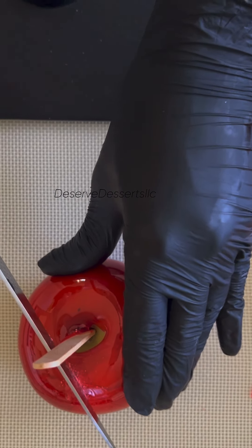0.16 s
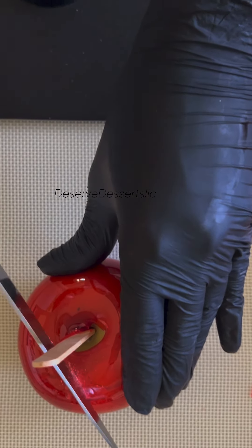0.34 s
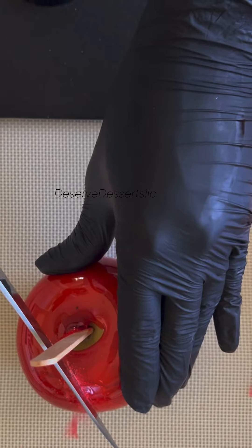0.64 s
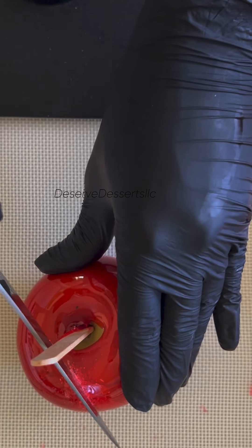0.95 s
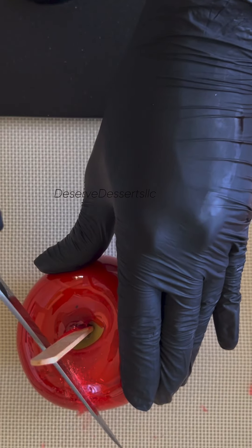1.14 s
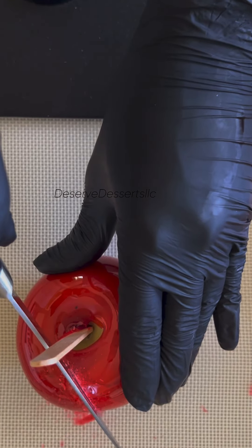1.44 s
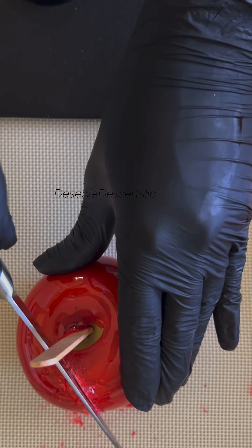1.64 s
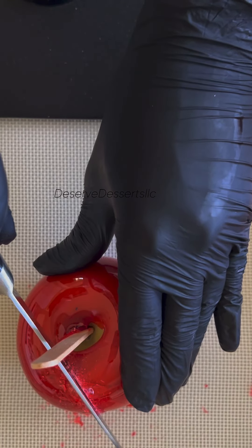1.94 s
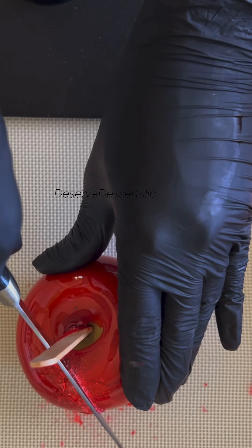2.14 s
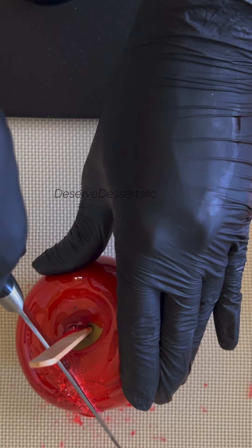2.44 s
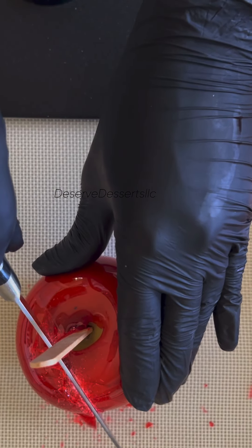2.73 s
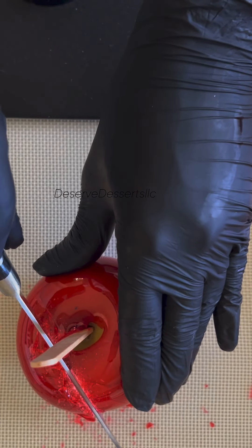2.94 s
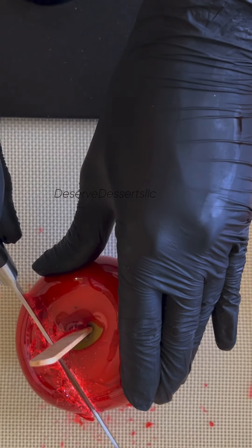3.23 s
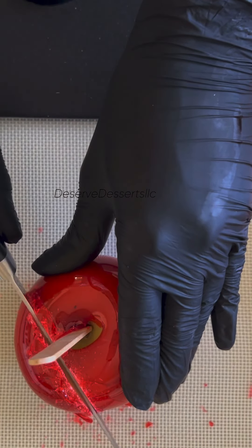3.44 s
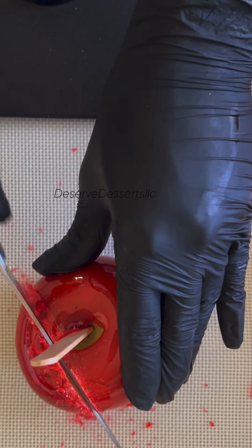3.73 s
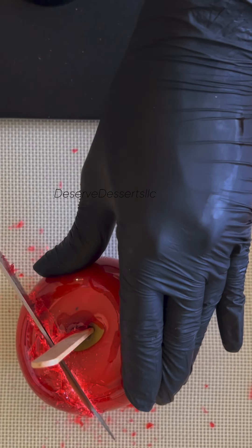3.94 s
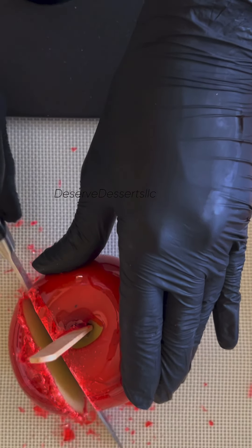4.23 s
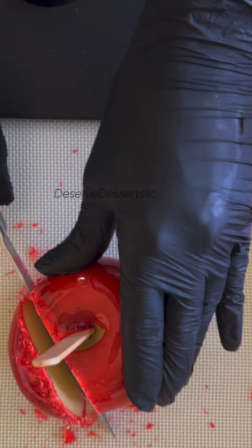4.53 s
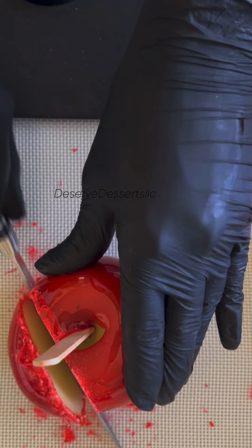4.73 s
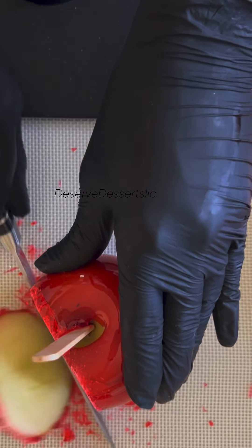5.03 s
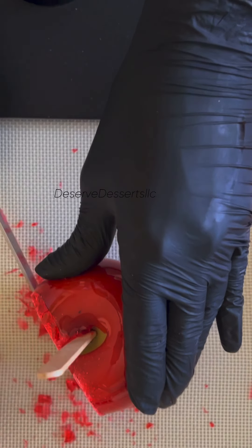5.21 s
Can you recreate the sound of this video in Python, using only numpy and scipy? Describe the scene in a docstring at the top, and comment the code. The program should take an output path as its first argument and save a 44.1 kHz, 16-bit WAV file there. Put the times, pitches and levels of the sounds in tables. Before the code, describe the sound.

Close, dry crunching and snapping of hard candy coating as a blade works down through an apple, ending in breakage and small dull knocks.

```python
"""A knife saws down through the hard sugar shell of an apple on a kitchen counter, heard by a phone close by.
An early thump of the hand's weight reaches the phone; the blade then rings high on the shell.
From about 1.2 s it rings damped inside the fruit, and towards the end lower, once it is through to the mat.
Bright cracks stand out of dense fine crunch, made of noise grains, and slips of the blade make the counter ring low.
Last, the cut piece rocks on the mat. A small kitchen answers briefly, and its quiet air lies under it all."""
import sys
import numpy as np
from scipy import signal
from scipy.fft import rfft, irfft
from scipy.io import wavfile

SR = 44100
rng = np.random.default_rng(int(sys.argv[2]) if len(sys.argv) > 2 else 0)


def master_out(mix):
    """Clip the mix to full scale and print it as 16-bit PCM to the path in sys.argv[1]."""
    frames = np.transpose(np.atleast_2d(mix))
    ceiling = np.clip(frames, -1, 1)
    pcm = np.round(ceiling * 32767).astype(np.int16)
    wavfile.write(sys.argv[1], SR, pcm)


N = 236799  # length in samples


def undb(db):
    """Decibels to gain."""
    return 10 ** (np.asarray(db) / 20)


def unit(x):
    """Scale to rms 1."""
    return x / np.sqrt(np.mean(x ** 2))


def filtered(x, order, hz, kind):
    """Let through only what lies above ("high") or below ("low") a pitch."""
    return signal.sosfilt(signal.butter(order, hz, kind, fs=SR, output="sos"), x)


def colour(x, points):
    """Causal filter through (Hz, dB) points, keeping the power of white noise."""
    size = 1024
    hz, db = np.transpose(points)
    bin_hz = np.arange(size // 2 + 1) * SR / size
    log_gain = np.interp(np.log(bin_hz + 1), np.log(hz), db) * np.log(10) / 20
    # folding the cepstrum forward in time makes the filter answer at once (minimum phase)
    fold = np.concatenate([[1], 2 * np.ones(size // 2 - 1), [1], np.zeros(size // 2 - 1)])
    h = irfft(np.exp(rfft(irfft(log_gain) * fold)))
    return signal.fftconvolve(x, h / np.linalg.norm(h))[:N]


def ring(x, modes, floor_hz):
    """A body of decaying modes that radiates little below floor_hz, keeping the power of white noise."""
    t = np.arange(SR // 5) / SR
    h = np.zeros(len(t))
    for k, (hz, width_hz, db) in enumerate(modes):
        # a wider mode dies faster; neighbours start in opposite directions
        h += (-1) ** k * undb(db) * np.exp(-np.pi * width_hz * t) * np.sin(2 * np.pi * hz * t)
    h = filtered(h, 3, floor_hz, "high")
    return signal.fftconvolve(x, h / np.linalg.norm(h))[:N]


def grit(rate, scatter_db, grain_s, bed):
    """Random fractures, rate per second: short noise grains of scattered size over a smooth bed."""
    sizes = undb(scatter_db * np.minimum(rng.exponential(size=N), 3))
    hits = (rng.random(N) < rate / SR) * sizes
    shape = signal.lfilter([1], [1, -np.exp(-1 / (grain_s * SR))], hits)
    return unit((unit(shape) + bed) * rng.standard_normal(N))


def bursts(times, dbs, rise_s, fall_s, carrier):
    """A carrier shaped into bursts with a quick rise and an exponential fall."""
    starts = np.zeros(N)
    starts[(times * SR).astype(int)] = undb(dbs)
    t = np.arange(SR // 4) / SR
    shape = (1 - np.exp(-t / rise_s)) * np.exp(-t / fall_s)
    return signal.fftconvolve(starts, shape)[:N] * carrier


def wander(rate):
    """Slow drift in straight lines between random levels, rate of them per second."""
    marks = np.arange(0, N + SR, SR / rate)
    return np.interp(np.arange(N), marks, rng.standard_normal(len(marks)))


# strokes of the knife; the last two columns are levels against the crunch, all before each layer's own trim:
# start_s [s], bite_s [s], hold_s [s], crunch_db [dB], rumble_db [dB], blade_db [dB]
KNIFE_STROKES = [(0.004, 0.013, 0.25, -69, 18, 2), (0.169, 0.094, 0.073, -48.5, 5, -1),
                 (0.389, 0.011, 0.062, -57, 19, -9), (0.487, 0.012, 0.13, -52, 15.5, -2),
                 (0.608, 0.012, 0.025, -48.5, 21, -8), (0.686, 0.011, 0.023, -55.5, 17.5, -3),
                 (1.061, 0.026, 0.011, -65, 30, -15), (1.097, 0.0094, 0.13, -43, 17.5, 0),
                 (1.401, 0.023, 0.11, -46, 8.5, 3), (1.624, 0.0072, 0.062, -45, 8, 2),
                 (1.712, 0.01, 0.032, -45.5, 8, 5), (1.892, 0.028, 0.083, -41, 14, 2),
                 (2.166, 0.039, 0.044, -51, 11, -1), (2.384, 0.034, 0.063, -43, 8, -0.5),
                 (2.501, 0.023, 0.51, -48, 9, 3), (2.775, 0.024, 0.2, -53.5, 14, 6.5),
                 (3.038, 0.048, 0.2, -39.5, 7.5, 2.5), (3.359, 0.011, 0.096, -50.5, 15.5, 13),
                 (3.498, 0.0096, 0.24, -56.5, 11.5, 11.5), (3.883, 0.015, 0.12, -36.5, 13, 9),
                 (3.957, 0.01, 0.18, -37.5, 13, 5.5), (4.213, 0.006, 0.06, -40.5, -5, 10),
                 (4.422, 0.022, 0.063, -69, 28.5, 18), (4.702, 0.018, 0.048, -55.5, 19.5, 12.5),
                 (4.748, 0.018, 0.058, -52, 18, 5.5), (4.879, 0.0044, 0.048, -41, 10, 14),
                 (5.052, 0.016, 0.059, -63.5, 29, 12.5), (5.111, 0.0068, 0.058, -43.5, -3, 7.5),
                 (5.182, 0.014, 0.044, -64.5, 22.5, 15), (5.283, .01, .08, -69, 18.5, 9)]
SAG_DB_PER_S = 31  # pressure eases while the edge slides
# how fast each layer dies once the edge stops
CRUNCH_RELEASE_DB_PER_S, COUNTER_RELEASE_DB_PER_S, BLADE_RELEASE_DB_PER_S = 246, 297, 200


def stroke_curves():
    """Levels of crunch, rumble and blade: each stroke bites, holds with a slow sag and dies away."""
    t = np.arange(0, N + SR // 10, 32) / SR
    start, bite, hold, crunch_db, rumble_db, blade_db = np.transpose(KNIFE_STROKES)[:, :, None]
    since = t - start
    rising = -20 * np.log10(np.clip(since / bite, .01, 1))
    sag = SAG_DB_PER_S * np.clip(since - bite, 0, None)
    stopped = np.clip(since - bite - hold, 0, None)
    layers = [(crunch_db, CRUNCH_RELEASE_DB_PER_S),
              (crunch_db + rumble_db, COUNTER_RELEASE_DB_PER_S),
              (crunch_db + blade_db, BLADE_RELEASE_DB_PER_S)]
    levels = []
    for db, release in layers:
        gain = undb(db - rising - sag - release * stopped)
        power = np.sum((since > 0) * gain ** 2, axis=0)  # overlapping strokes add up
        levels.append(np.interp(np.arange(N) / SR, t, 10 * np.log10(power + 1e-12)))
    return levels


# snaps of the shell, before trims: start_s [s], level_db [dB], blade_db [dB, blade and fruit against the snap]
SHELL_SNAPS = [(0.1562, -47, 6.5), (0.402, -29.5, -7.5), (0.5212, -28.5, -2), (0.603, -20.5, 0.5),
               (0.614, -27.5, -13), (0.712, -28, -9.5), (1.104, -19, -4), (1.133, -37, 3),
               (1.1817, -20, -6), (1.22, -20, -11), (1.2496, -23, -13.5), (1.4305, -22, -7.5),
               (1.639, -24, -2.5), (1.723, -31, -7.5), (1.9155, -20.5, -6.5), (1.995, -30, -23),
               (2.3947, -27, -13), (2.4208, -19, -7), (2.4488, -18, -12.5), (2.6234, -21.5, -7.5),
               (2.7033, -19.5, -15), (2.754, -22, -24), (2.9367, -29.5, -3.5), (2.983, -22.5, -39),
               (3.269, -18.5, -47), (3.3268, -21.5, -17), (3.3468, -14.5, -15), (3.362, -12.5, -8.5),
               (3.8952, -30, -20), (4.0093, -11, -3.5), (4.0998, -20, -43), (4.131, -15, -7.5),
               (4.2202, -11, -1), (4.794, -28, -6), (4.899, -25, 4), (5.114, -13, -0.5)]
# tone of breaking sugar: pitch_hz [Hz], level_db [dB per Hz]
SHARD_TONE = [(900, -34), (1470, -21), (2500, 1.5), (3550, -6.5), (4020, 3), (4580, -6), (5070, -1.5),
              (5970, -2.5), (8940, 1.5), (9960, -3.5), (12100, 2.5), (14700, -4), (16000, -7)]
SPLINTER_HZ = 6660  # thin splinters sound mainly above this


def shell(crunch_db):
    """Fine crunch of sugar under the edge; each larger snap runs on in a spray of smaller fractures."""
    s, db, blade_db = np.transpose(SHELL_SNAPS)
    chips = grit(400., 5., .0015, .5)
    splinters = grit(400., 5., .0012, .5)
    # a snap that hardly moves the blade is a thin splinter and sounds mostly at the top
    thin = np.clip((4.5 - blade_db) / 15, .02, .98)
    thick_db, thin_db = 10 * np.log10(1 - thin), 10 * np.log10(thin)
    noise = rng.standard_normal((2, N))
    crunch_gain = undb(crunch_db - 2.0)
    full = crunch_gain * chips
    full += bursts(s, db - 4.0 + thick_db, 0.0015, 0.003, noise[0])
    full += bursts(s, db - 31.5, 0.0089, 0.033, chips)  # spray of smaller fractures
    top = crunch_gain * splinters + bursts(s, db + thin_db, 0.00092, 0.0029, noise[1])
    return colour(full + filtered(top, 2, SPLINTER_HZ, "high"), SHARD_TONE)


# the blade rings high on the shell, is damped inside the fruit and rings lower once it is through;
# modes in each place, levels before scaling: pitch_hz [Hz], width_hz [Hz], level_db [dB]
SHELL_MODES = [(2180, 250, 2), (2780, 2800, 10), (4370, 520, -4.5)]
FRUIT_MODES = [(737, 470, 4.5), (1240, 370, 0), (1592, 410, 0), (2134, 220, -1), (2810, 940, -1)]
MAT_MODES = [(744, 147, -4), (1040, 200, -32), (1304, 220, 3.5), (1396, 60, -1), (1765, 250, -4.5),
             (3100, 2100, -41)]
# how deep the blade is: time_s [s], depth [0 on the shell, 1 in the fruit, 2 through to the mat]
BLADE_DEPTH = [(.15, 1.2), (.25, 0.024), (.9, 0.027), (1.2, 0.65), (1.42, 1.02), (3.7, 1), (4.2, 1.43),
               (4.7, 1.99)]


def depth_curve():
    """Depth of the blade over time."""
    return np.interp(np.arange(N) / SR, *np.transpose(BLADE_DEPTH))


def blade(blade_level_db):
    """Blade and fruit ring at mid pitches, driven by crunch and by the same snaps as the shell."""
    s, db, blade_db = np.transpose(SHELL_SNAPS)
    crunch = grit(300., 3., .002, .7)
    snaps = bursts(s, db + blade_db + 1, 0.0029, 0.004, rng.standard_normal(N))
    snaps += bursts(s, db + blade_db - 13.0, 0.0022, 0.025, crunch)
    push = undb(blade_level_db - 5.5) * crunch + snaps
    depth = depth_curve()
    # crossfade from place to place as the blade sinks
    on_shell, in_fruit, on_mat = [np.sqrt(np.clip(1 - abs(depth - k), 0, 1)) for k in range(3)]
    fruit = np.zeros(N)
    for mode in FRUIT_MODES:
        # the contact point slides along the edge, so each mode in the fruit comes and goes
        grip = undb(3 * wander(7))
        fruit += undb(mode[2] - 7.0) * ring(push * in_fruit * grip, [mode], 270.0)
    return ring(push * on_shell, SHELL_MODES, 1770.0) + fruit + ring(push * on_mat, MAT_MODES, 630.0)


# slips of the blade felt by the counter: start_s [s], level_db [dB before trims]
BLADE_SLIPS = [(0.159, -24), (0.401, -20), (0.496, -26.5), (0.523, -24), (0.6, -13.5), (0.616, -18.5),
               (0.71, -28), (1.103, -9), (1.116, -16), (1.198, -17.5), (1.435, -23), (1.732, -29),
               (1.913, -19), (2.193, -24.5), (2.462, -23), (3.365, -17), (3.415, -23), (3.483, -25.5),
               (3.582, -17.5), (3.98, -27), (4.001, -12.5), (4.224, -12.5), (5.115, -20.5), (5.345, -25.5)]
# upper and deep modes of the counter, levels before scaling: pitch_hz [Hz], width_hz [Hz], level_db [dB]
COUNTER_MODES = [(239, 32, -30), (278, 36, 2.5), (358.7, 52.6, 6), (421.8, 51.2, 7), (525, 33, -11.5),
                 (559, 50, -6.5), (695, 17, -16)]
DEEP_MODES = [(125.4, 41, -14), (192, 60, 1.5)]
DEEP_SLIP_DB = -12  # lowers both parts of a slip in the deep modes


def counter(rumble_db):
    """The counter's low modes, shaken by the sawing and struck by each slip; the mat dulls what reaches it."""
    s, db = np.transpose(BLADE_SLIPS)
    noise = rng.standard_normal(N)
    saw = undb(rumble_db - 2) * grit(120., 2.3, 0.01, 0.87)
    # the deeper the blade, the more weight bears down on the deep modes
    weight = np.clip(depth_curve(), .15, 1)
    # a slip is one clean shove and a judder that dies away after it
    upper_shove = bursts(s + 0.00207, db + 5.0, 0.00012, 0.00026, 1)
    upper_judder = bursts(s, db - 5.5, 0.0027, 0.028, noise)
    deep_shove = bursts(s, db + DEEP_SLIP_DB + 5, 0.00039, 0.00041, 1)
    deep_judder = bursts(s, db + DEEP_SLIP_DB, 0.00043, 0.0076, noise)
    upper = saw + upper_shove + upper_judder
    deep = undb(-4.0) * weight * saw + deep_shove + deep_judder
    return filtered(ring(upper, COUNTER_MODES, 270.0) + ring(deep, DEEP_MODES, 59.0), 3, 850., "low")


# the cut piece rocks on the mat: start_s [s], level_db [dB before shaping]
PIECE_ROCKS = [(5.22, -35), (5.235, -39), (5.296, -34.5), (5.317, -32), (5.342, -34), (5.357, -38)]
# modes of the piece, levels before scaling: pitch_hz [Hz], width_hz [Hz], level_db [dB]
PIECE_MODES = [(430, 90, -3), (695, 96, 0), (2790, 90, -20.5)]


def piece():
    """Dull knocks of the loose slice: noise bursts ring its modes."""
    s, db = np.transpose(PIECE_ROCKS)
    return ring(bursts(s, db, 0.0011, 0.0032, rng.standard_normal(N)), PIECE_MODES, 230.0)


# weight shifts through the counter: start_s [s], sway_db [dB before shaping]
WEIGHT_SHIFTS = [(0.03, -42), (0.098, -38), (0.122, -36), (0.143, -16), (0.161, -7), (1.134, -22.5),
                 (2.088, -45.5), (4.056, -27.5), (4.115, -28), (4.159, -28), (4.439, -38), (4.528, -28),
                 (4.555, -29.5), (4.74, -32), (4.79, -31.5), (4.885, -27.5), (4.939, -21.5), (5.076, -31)]
SWAY_HZ, KNOCK_HZ = 32.6, 92.2  # the knock's pitch is scattered around its value
KNOCK_DB = -2.5  # knock against sway


def thumps():
    """Soft pushes that rock the phone's stand: a slow sway and a quicker knock."""
    out = np.zeros(N + SR)
    t = np.arange(SR // 5) / SR
    shape = t / 0.0078 * np.exp(1 - t / 0.0098)
    draws = rng.random((len(WEIGHT_SHIFTS), 3))
    for (s, db), (sway_phase, knock_phase, scatter) in zip(WEIGHT_SHIFTS, draws):
        sway = np.sin(2 * np.pi * (SWAY_HZ * t + sway_phase))
        knock_hz = KNOCK_HZ * (0.85 + 0.41 * scatter)
        knock = undb(KNOCK_DB) * shape * np.sin(2 * np.pi * (knock_hz * t + knock_phase))
        i = int(s * SR)
        out[i:i + len(t)] += undb(db) * shape * (sway + knock)
    return out[:N]


ROOM_T60_S, ROOM_DB = 0.089, -9  # time to fall by 60 dB; level of the tail


def room(x):
    """Diffuse tail of a small kitchen: noise that swells over some milliseconds and dies quickly."""
    t = np.arange(SR // 2) / SR
    h = rng.standard_normal(len(t)) * (1 - np.exp(-t / 0.014)) * undb(-60 * t / ROOM_T60_S)
    return undb(ROOM_DB) * signal.fftconvolve(x, h / np.linalg.norm(h))[:N]


# tone of the kitchen's air, before scaling: pitch_hz [Hz], level_db [dB per Hz]
AIR_TONE = [(12, -37), (20, -7), (91, -11.5), (146, -7.5), (660, -23), (1260, -31.5), (1570, -32.5),
            (4670, -40), (12400, -43.5), (16000, -35)]
AIR_DB = -58  # rms level of the air


def kitchen():
    """Quiet air of the kitchen: steady coloured noise."""
    hz, db = np.transpose(AIR_TONE)
    bin_hz = np.arange(N // 2 + 1) * SR / N
    gain = undb(np.interp(np.log(bin_hz + 1), np.log(hz), db))
    return undb(AIR_DB) * unit(irfft(rfft(rng.standard_normal(N)) * gain, N))


def scene():
    """All sources at the phone."""
    crunch_db, rumble_db, blade_db = stroke_curves()
    near = shell(crunch_db) + blade(blade_db) + counter(rumble_db) + piece()
    return (near + room(near) + thumps() + kitchen())[None]


TOP_HZ = 16000  # the phone passes little above this


def record(dry):
    """The phone rounds the loudest peaks and cuts the top."""
    rounded = np.tanh(1.5 * dry) / 1.5
    return signal.sosfilt(signal.ellip(10, .5, 80, TOP_HZ, fs=SR, output="sos"), rounded)


dry = scene()
out = record(dry)
master_out(out)
```